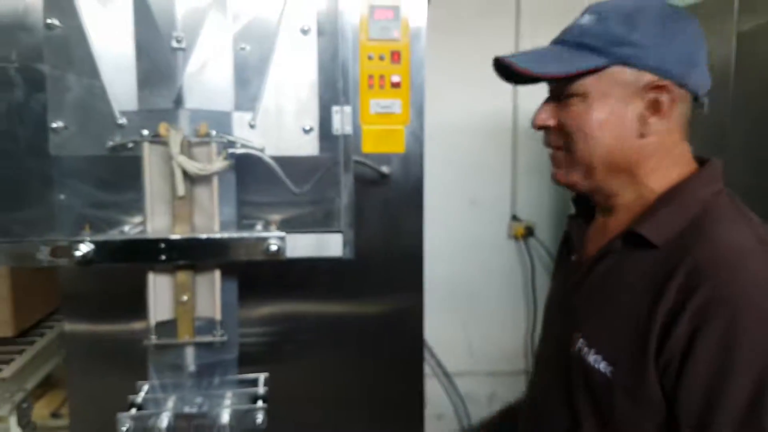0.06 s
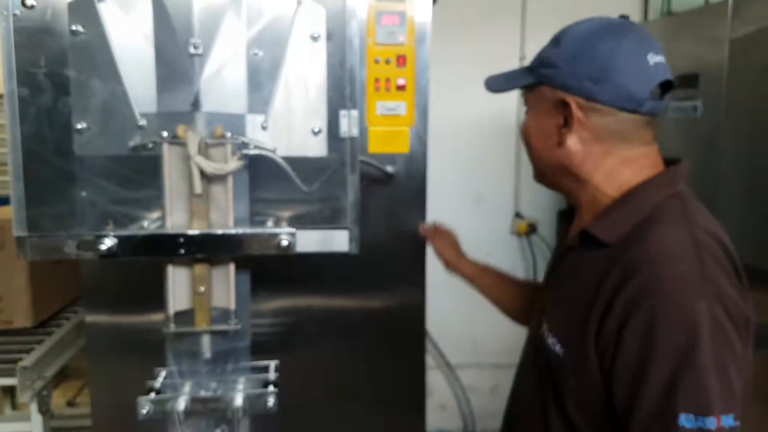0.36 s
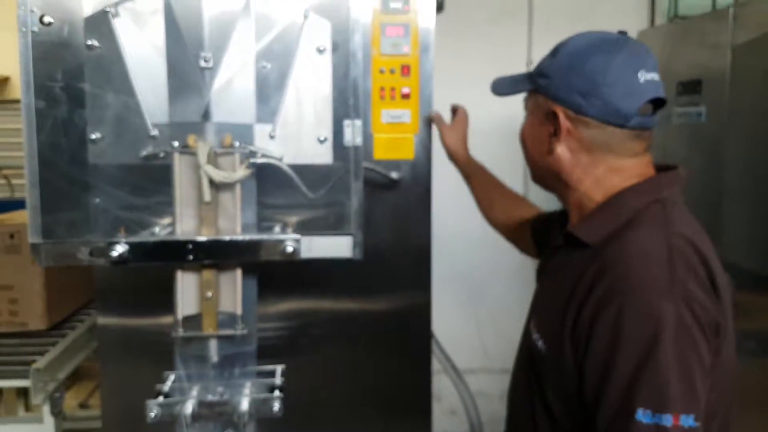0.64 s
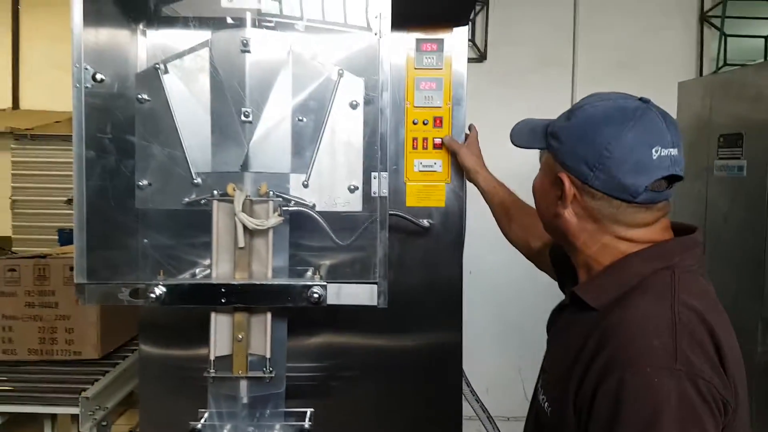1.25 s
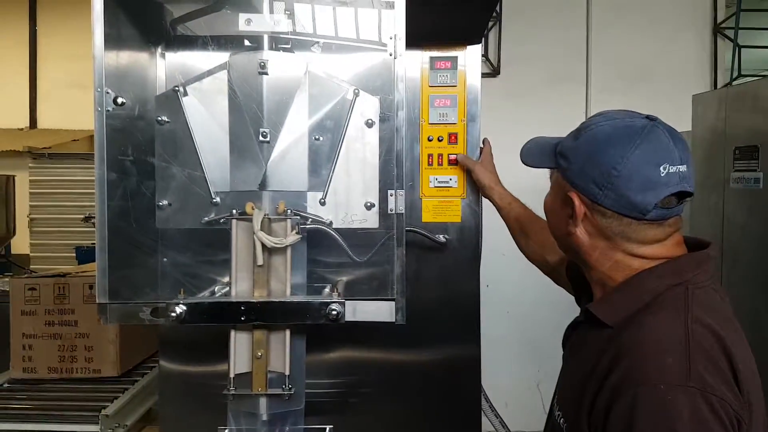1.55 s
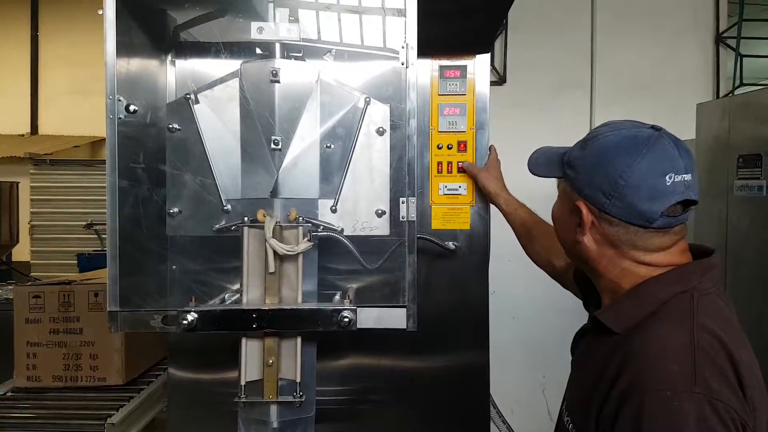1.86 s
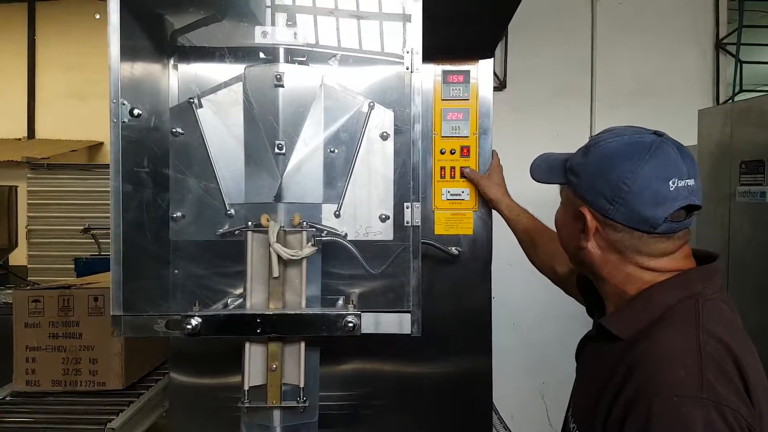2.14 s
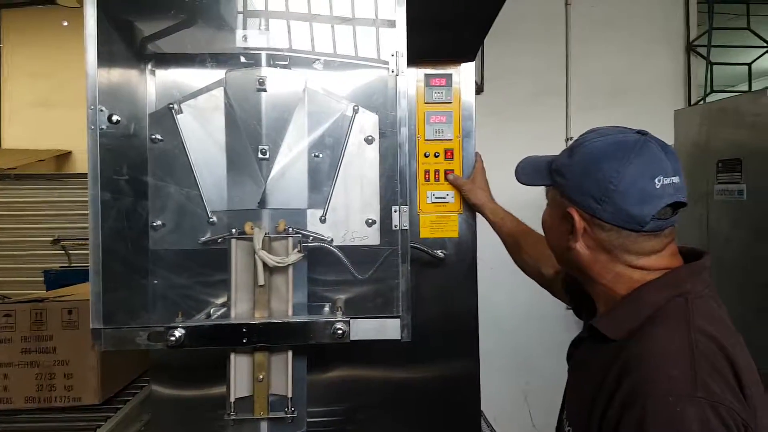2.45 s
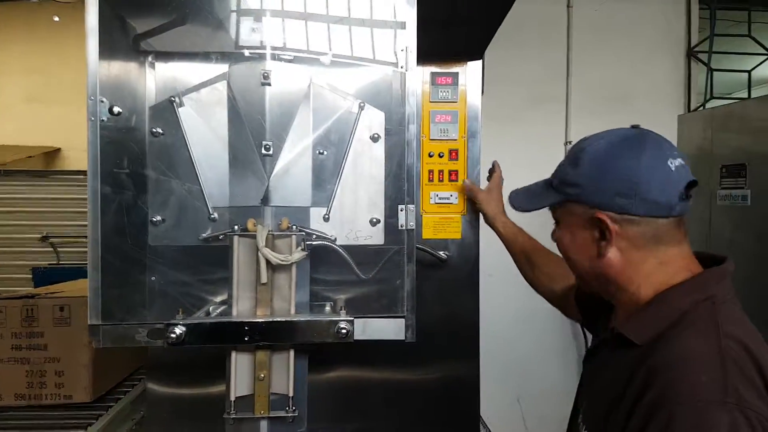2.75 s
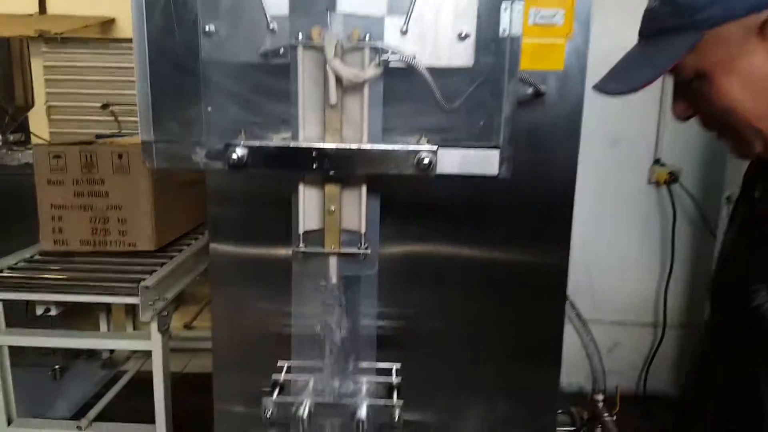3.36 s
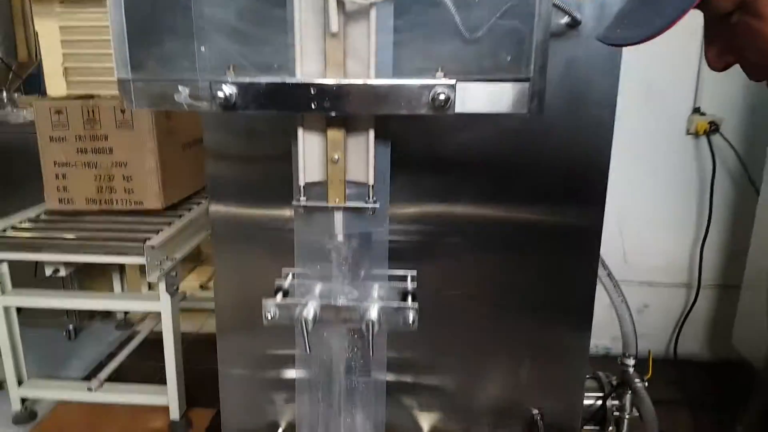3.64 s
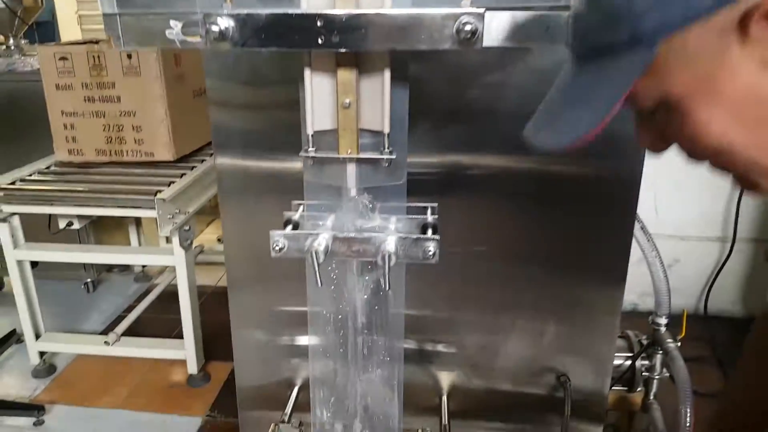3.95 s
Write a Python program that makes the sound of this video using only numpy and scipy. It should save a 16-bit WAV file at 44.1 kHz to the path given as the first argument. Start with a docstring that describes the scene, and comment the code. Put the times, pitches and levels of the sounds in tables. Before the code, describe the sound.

A packaging machine starts close by in a workshop, after a stretch of quiet ventilation hum. Metal clacks and air puffs mark the start; the motor growls upward, then settles into a low drone and gear whine.

```python
"""Ventilation hums in a workshop; then a pouch packaging machine is switched on near the stereo pair.
Contacts clack, and the motor runs up with a rising growl that sets the panels booming, then settles
into a low drone with a gear whine that sags under load. Levers and jaws clack against the steel frame,
valves let off short puffs of air, and the film hisses as it is drawn. A short ring of the room follows
the clacks and puffs; the bass sits in the centre and the treble spreads wide."""
import sys
import numpy as np
from scipy import signal
from scipy.fft import rfft, irfft
from scipy.io import wavfile

SR = 44100
rng = np.random.default_rng(int(sys.argv[2]) if len(sys.argv) > 2 else 0)


def generate_wav(sig):
    """Save sig (samples, or channels by samples) to the path in sys.argv[1] as 16-bit PCM at SR."""
    pcm = np.round(np.clip(np.atleast_2d(sig).T, -1, 1) * 32767).astype(np.int16)
    wavfile.write(sys.argv[1], SR, pcm)


N = 176400
T = np.arange(N) / SR
START_S, START_RISE_S = 2.36, 0.032

# stereo width at the microphones: (frequency [Hz], side minus mid [dB])
STEREO_WIDTH = [(35, -28), (75, -20.5), (170, -20), (350, -12.5), (700, -7), (1400, 0.5), (2800, -0.6),
                (6000, 0.5)]


def from_db(db):
    """Decibels to gain."""
    return 10 ** (np.asarray(db) / 20)


def unit_rms(x):
    """Scale to unit power."""
    return x / np.sqrt(np.mean(x ** 2) + 1e-20)


def in_time(rows):
    """A control curve at every sample."""
    return np.interp(T, *np.transpose(rows))


def at_hz(points, hz):
    """Read a spectrum on a log-frequency axis."""
    freqs, levels = np.transpose(points)
    return np.interp(np.log(np.maximum(hz, 1)), np.log(freqs), levels)


def running(levels):
    """Gain of a machine layer: silent until switch-on, then on its level curve."""
    return from_db(in_time(levels)) * np.clip((T - START_S) / START_RISE_S, 0, 1)


def swells(events):
    """Gain that rises and falls in a half sine for each event."""
    return sum(from_db(db) * np.sin(np.pi * np.clip((T - start) / length, 0, 1))
               for start, length, db in events)


def noise(gain_at, size=N):
    """Stereo noise of a given colour, alike at both microphones in the bass only; rms 1."""
    # lean of the stereo image: (frequency [Hz], left minus right [dB])
    balance = [(60, -0.1), (700, -1), (2400, 0), (5500, -4.5), (9500, 0.5), (14000, -6)]
    hz = np.arange(size // 2 + 1) * SR / size
    sides = np.array([[1], [-1]])
    width = from_db(at_hz(STEREO_WIDTH, hz))
    mid, side = rfft(rng.standard_normal((2, size)))
    pair = (mid + width * side * sides) / np.hypot(1, width)
    lean = from_db(sides * at_hz(balance, hz) / 2)
    return unit_rms(irfft(pair * lean * gain_at(hz), size))


def coloured(spectrum, size=N):
    """Noise with a broad spectrum; rms 1."""
    return noise(lambda hz: from_db(at_hz(spectrum, hz)), size)


def whistle(centre_hz, width_hz):
    """Noise through a narrow resonance; rms 1."""
    return noise(lambda hz: 1 / (1 + ((hz - centre_hz) / width_hz) ** 2))


def wavering(phase, width_hz):
    """A partial whose strength and phase wander at random, narrow in stereo when low; rms 1."""
    hz = np.arange(N // 2 + 1) * SR / N
    drift = irfft(rfft(rng.standard_normal((4, N))) / (1 + (hz / width_hz) ** 2), N)
    mid = drift[0] * np.cos(phase) + drift[1] * np.sin(phase)
    side = drift[2] * np.cos(phase) + drift[3] * np.sin(phase)
    pitch_hz = np.gradient(phase) * SR / (2 * np.pi)
    width = from_db(at_hz(STEREO_WIDTH, pitch_hz))
    return unit_rms(mid + width * side * np.array([[1], [-1]]))


def ventilation():
    """Room tone all round the microphones: steady air noise and a few gently swelling fan tones."""
    # air noise: (frequency [Hz], relative density [dB])
    air_spectrum = [(20, -31), (36, -14), (48, -11), (68, 1), (85, -3), (108, -7.5), (149, -2.5),
                    (230, -10.5), (310, -9.5), (450, -14.5), (750, -15.5), (1100, -19), (2100, -27),
                    (2700, -28.5), (3500, -31), (4100, -37), (4700, -37.5), (5600, -43.5), (7600, -46),
                    (10000, -47.5), (13000, -48), (16000, -52)]
    # fan tones: (frequency [Hz], width [Hz], level before the swell [dB])
    fan_tones = [(1096, 16, -58.5), (2888, 73, -52.5), (11400, 15, -79)]
    # swell of the fan tones: (time [s], gain [dB])
    fan_swell = [(0, 1), (.14, 4.5), (.3, -2.5), (1.3, 1.5), (1.7, 1.5), (2.3, 0)]
    tones = sum(from_db(db) * whistle(hz, width) for hz, width, db in fan_tones)
    return from_db(-38) * coloured(air_spectrum) + from_db(in_time(fan_swell)) * tones


def room(direct, t60_s=0.29, level_db=-5.5):
    """The walls return a diffuse ring, starting 4 ms behind the direct sound."""
    t = T[:SR]
    tail = rng.standard_normal((2, SR)) * from_db(-60 * t / t60_s) * (t > .004)
    tail /= np.sqrt(np.sum(tail ** 2, axis=1, keepdims=True))
    return direct + from_db(level_db) * signal.fftconvolve(direct, tail, axes=1)[:, :N]


def film():
    """Film hisses over the former; now and then a slide squeals thinly."""
    # sliding film: (frequency [Hz], relative density [dB])
    hiss_spectrum = [(500, -3.5), (1500, 8.5), (3000, 0.5), (5000, -2.5), (6800, -4), (8000, -11.5),
                     (12500, -11.5), (16000, -24)]
    # draw of the film: (time [s], level [dB])
    hiss_level = [(2.36, -33), (2.5, -32), (2.7, -37.5), (2.96, -36), (3.12, -41), (3.28, -42.5),
                  (3.39, -53), (3.49, -44.5), (3.68, -57), (3.74, -43), (3.84, -59), (4.0, -39)]
    # squeals of the slide: (start [s], length [s], peak level [dB])
    squeals = [(2.6, .15, -55), (3.2, .3, -58), (3.54, 0.22, -56)]
    hiss = running(hiss_level) * coloured(hiss_spectrum)
    return hiss + swells(squeals) * whistle(14200, width_hz=240)


def jaw_scrapes():
    """The jaws scrape grittily on their guides; each stroke swells and fades."""
    # jaw strokes: (start [s], length [s], peak level [dB])
    strokes = [(2.699, 0.036, -28.5), (2.794, 0.07, -34), (3.172, 0.07, -37.5), (3.456, 0.11, -37.5),
               (3.546, 0.037, -45), (3.86, 0.07, -35), (3.94, 0.096, -30.5)]
    # friction on the guides: (frequency [Hz], relative density [dB])
    grit_spectrum = [(300, -11), (900, -1.5), (1300, 2.5), (1900, 2), (2700, -5), (4000, -9), (8000, -28),
                     (16000, -30)]
    return swells(strokes) * coloured(grit_spectrum)


def valve_puffs(t60_s=0.22):
    """Valves open, hold and let the air die away."""
    # valve openings: (start [s], rise [s], hold [s], level [dB])
    openings = [(2.368, .01, 0.035, -35.5), (2.422, 0.029, 0.034, -32.5), (2.8, .004, 0.04, -35),
                (3.18, .02, 0.023, -39), (3.957, .012, 0.038, -46)]
    # escaping air: (frequency [Hz], relative density [dB])
    jet_spectrum = [(800, 1), (2000, 2), (4000, 1.5), (6500, -1.5), (8500, -5), (10500, -10), (12000, 3),
                    (14000, -5.5), (16000, -32)]
    flow = 0
    for start, rise, hold, db in openings:
        fading_s = np.maximum(T - start - rise - hold, 0)
        flow += np.clip((T - start) / rise, 0, 1) * from_db(db - 60 * fading_s / t60_s)
    return flow * coloured(jet_spectrum)


def pings(t60_s=0.046):
    """Small hard parts ring briefly, each in its own tight cluster of modes."""
    # struck parts: (time [s], pitch [Hz], level [dB])
    strikes = [(2.3555, 9060, -29.5), (3.186, 9440, -36), (3.204, 9550, -34), (3.2374, 4720, -30),
               (3.9454, 9090, -28.5)]
    out = 0
    for start, hz, db in strikes:
        decay = (T >= start) * from_db(db - 60 * np.maximum(T - start, 0) / t60_s)
        out += decay * whistle(hz, width_hz=220)
    return out


def frame_rumble(knocks_per_s=70, rattle_db=-13):
    """The frame rumbles and loose parts rattle in it."""
    # shaking frame: (frequency [Hz], relative density [dB])
    rumble_spectrum = [(25, -47), (50, -7), (80, -1.5), (125, 2.5), (180, 0.5), (290, -2.5), (500, -6.5),
                       (800, -10), (1150, -10), (1500, -17), (2600, -21), (4000, -28), (8000, -39),
                       (16000, -42.5)]
    # strength of the shaking: (time [s], level [dB])
    rumble_level = [(2.36, -27.5), (2.45, -33), (2.7, -30.5), (2.83, -29.5), (2.92, -30.5), (3.12, -31.5),
                    (3.22, -26), (3.4, -28.5), (3.65, -29.5), (3.82, -30), (4.0, -31.5)]
    # one knock of a loose part: (frequency [Hz], relative density [dB])
    knock_spectrum = [(200, 6.5), (600, -3), (2500, -3), (5000, -22.5), (16000, -46)]
    impacts = (rng.random(N) < knocks_per_s / SR) * rng.uniform(0.82, 1, N)
    softened = signal.sosfilt(signal.butter(2, 3600, fs=SR, output="sos"), impacts)
    knock = coloured(knock_spectrum, size=4096) * from_db(-60 * T[:4096] / 0.01)
    rattle = unit_rms(signal.fftconvolve(softened[None], knock, axes=1)[:, :N])
    return running(rumble_level) * (coloured(rumble_spectrum) + from_db(rattle_db) * rattle)


def frame_thumps(rise_s=0.01, t60_s=0.3):
    """Dull knocks swell briefly and die in the frame, dead centre between the microphones."""
    # low knocks: (time [s], pitch [Hz], level the decay starts from [dB])
    knocks = [(2.371, 181, -23), (2.405, 245, -23), (2.803, 333, -20), (2.81, 388, -27.5), (3.18, 180, -28),
              (3.23, 232.7, -35), (3.73, 169.8, -27.5)]
    out = 0
    for start, hz, db in knocks:
        age = np.maximum(T - start, 0)
        envelope = np.minimum(age / rise_s, 1) * from_db(db - 60 * age / t60_s)
        out += envelope * np.sin(2 * np.pi * hz * age)
    return out


def clacks(crack_s=0.0037, body_t60_s=0.084, tilt_from_hz=1740):
    """Each contact is a short crack, a noisy body and the ring of steel; some are dull, some bright."""
    # contacts: (time [s], level [dB], treble tilt [dB per decade], left minus right [dB])
    contacts = [(2.3479, -27.5, 4, 4), (2.3549, -34, 11, -2), (2.3762, -20.5, -5, -0.5),
                (2.4192, -25.5, 4, 4), (2.452, -24, 9, 2), (2.716, -24.5, -34, -1), (2.7449, -28.5, -7, 2),
                (2.799, -27, 9, 3), (3.1732, -39, 19, 12), (3.1904, -33, 8, 4), (3.2046, -30.5, 12, 3),
                (3.2384, -31.5, 5, -4), (3.4724, -31.5, -22, 3.5), (3.5644, -30, -49, 1),
                (3.7358, -37, 0, 4), (3.8716, -31.5, -5, 7), (3.885, -37, -12, 1), (3.8934, -32.5, 14, 5),
                (3.9469, -24, 29, 3)]
    # impact noise before the tilt: (frequency [Hz], relative density [dB])
    impact_spectrum = [(100, -22), (300, 9), (900, -8), (1400, -6.5), (2400, -7), (4000, -4.5),
                       (7000, -13.5), (12000, -15), (16000, -17)]
    # modes of the steel levers: (frequency [Hz], relative level [dB], T60 [s])
    lever_modes = [(950, -8.5, 0.072), (1550, -14.5, 0.23), (1983, -14.5, 0.21), (2506, -13, 0.14),
                   (3900, -18, 0.13)]
    out, t = np.zeros((2, N + SR)), T[:16384]
    envelope = from_db(-2.5) * np.exp(-t / crack_s) + from_db(-5.5 - 60 * t / body_t60_s)
    for start, db, tilt_db, pan_db in contacts:
        def colour(hz):
            treble_db = tilt_db * np.log10(np.maximum(hz / tilt_from_hz, 1))
            return from_db(at_hz(impact_spectrum, hz) + treble_db)
        hit = envelope * noise(colour, size=len(t))
        for mode_hz, mode_db, t60 in lever_modes:
            strike_db = rng.normal(0, 2.5, (2, 1))
            ring = np.sin(2 * np.pi * (mode_hz * t + rng.random((2, 1))))
            hit += from_db(mode_db + strike_db - 60 * t / t60) * ring
        i = int(start * SR)
        out[:, i:i + len(t)] += hit * from_db(db + np.array([[pan_db], [-pan_db]]) / 2)
    return out[:, :N]


def drive_whine(pitch_hz=1003):
    """A clean tone of the drive, steady in pitch, that comes up as the jaws travel."""
    # rise of the tone: (time [s], level [dB])
    tone_level = [(3.5, -58), (3.68, -41.5)]
    return running(tone_level) * np.sqrt(2) * np.sin(2 * np.pi * pitch_hz * T)


def magnetic_drone(hum_hz=119.95):
    """The motor hums through the frame at twice the mains rate, louder under load."""
    # strength of the hum: (time [s], level [dB])
    hum_level = [(2.36, -59), (2.56, -53), (2.64, -26.5), (2.72, -49), (2.96, -30.5), (3.08, -32),
                 (3.2, -24), (3.32, -29.5), (3.54, -29), (3.7, -30), (3.8, -47), (4.0, -34.5)]
    # hum partials: (multiple of hum_hz, relative level [dB], roughness [ratio])
    partials = [(1, 1, 0.26), (2, -11, 0.52)]
    phase = 2 * np.pi * hum_hz * T
    hum = sum(from_db(db) * (np.sqrt(2) * np.sin(k * phase) + rough * wavering(k * phase, width_hz=25))
              for k, db, rough in partials)
    return running(hum_level) * hum


def panel_booms(mesh_hz, catch_hz=44.8, t60_s=.5):
    """Each panel booms as the gear mesh rate sweeps through its resonance."""
    # panel resonances: (frequency [Hz], level under sustained drive [dB])
    panels = [(236, -37), (376, -32), (445, -28), (565, -21.5), (690, -31), (745, -27), (846, -31)]
    decay = from_db(-60 / (t60_s * SR))
    out = 0
    for hz, db in panels:
        drive = (T > START_S) / (1 + ((mesh_hz - hz) / catch_hz) ** 2)
        envelope = signal.lfilter([1 - decay], [1, -decay], drive)
        out += from_db(db) * envelope * wavering(2 * np.pi * hz * T, width_hz=9.8)
    return out


def run_up_growl(mesh_phase):
    """Rough bands climb with the motor and fade as it reaches speed."""
    # strength of the growl: (time [s], level [dB])
    growl_level = [(2.36, -61), (2.42, -30.5), (2.5, -29), (2.64, -27.5), (2.72, -33.5), (2.85, -39),
                   (3.0, -65)]
    # growl bands: (multiple of the mesh rate, width [Hz], relative level [dB])
    bands = [(.62, 70, -8), (.85, 60, -7.5), (1.0, 50, -3.5), (1.3, 109, -7.5)]
    growl = sum(from_db(db) * wavering(k * mesh_phase, width) for k, width, db in bands)
    return running(growl_level) * growl


def gear_whine(mesh_hz, mesh_phase, width_hz=10.3, left_lead_rad=0.99):
    """Meshing teeth sing a slightly rough tone; further partials grow with the square of the speed."""
    # strength of the mesh tone: (time [s], level [dB])
    whine_level = [(2.36, -57), (2.5, -40), (2.7, -43), (2.99, -40.5), (3.035, -29.5), (3.13, -33.5),
                   (3.18, -35.5), (3.3, -37.5), (3.41, -40), (3.455, -27.5), (3.51, -38), (3.7, -41.5),
                   (4.0, -49)]
    # further gear partials: (multiple of the mesh rate, level at top speed [dB])
    gear_partials = [(.235, -39.5), (0.314, -46), (.55, -50.5), (.775, -49.5), (.898, -47), (1.105, -60)]
    tone = np.sqrt(2) * np.sin(mesh_phase + np.array([[left_lead_rad], [0]]))
    whine = tone + .3 * wavering(mesh_phase, width_hz)
    partials = sum(from_db(db) * (np.sin(k * mesh_phase) + 0.95 * wavering(k * mesh_phase, width_hz))
                   for k, db in gear_partials)
    speed_gain = (T > START_S) * (mesh_hz / mesh_hz.max()) ** 2
    return running(whine_level) * whine + speed_gain * partials


def motor():
    """The motor runs up and sags under load; growl, booms and gear whine follow its speed."""
    # motor speed: (time [s], gear mesh rate [Hz])
    speed = [(2.36, 150), (2.42, 375), (2.49, 574.8), (2.58, 650), (2.68, 790), (2.79, 1069), (2.85, 1134),
             (3.03, 1098), (3.14, 1099), (3.3, 1067), (3.45, 1088), (3.6, 1116), (3.8, 1120), (4.0, 1111)]
    mesh_hz = in_time(speed)
    mesh_phase = 2 * np.pi * np.cumsum(mesh_hz) / SR
    gears = run_up_growl(mesh_phase) + panel_booms(mesh_hz) + gear_whine(mesh_hz, mesh_phase)
    return gears + drive_whine() + magnetic_drone()


def scene():
    """The machine close by, over the room tone; clacks, pings and puffs ring in the workshop."""
    direct = motor() + ventilation() + frame_rumble() + frame_thumps() + film() + jaw_scrapes()
    return direct + room(clacks() + pings() + valve_puffs())


def record(dry, cutoff_hz=15800):
    """A steep low-pass behind the microphones cuts the highest treble."""
    return signal.sosfilt(signal.ellip(10, .2, 70, cutoff_hz, fs=SR, output="sos"), dry)


dry = scene()
out = record(dry)
generate_wav(out)
```